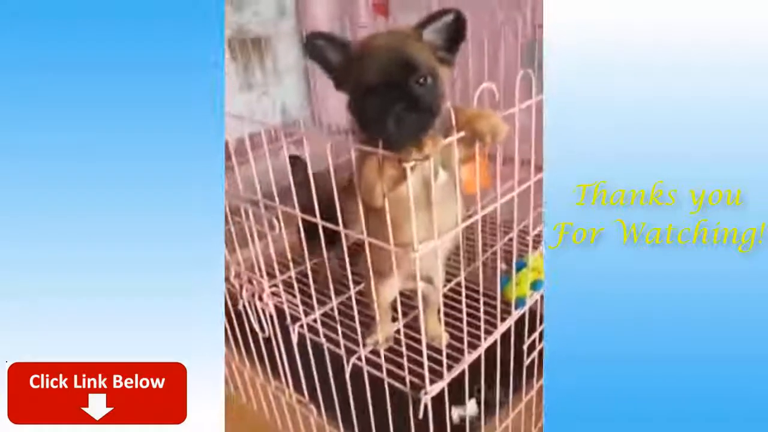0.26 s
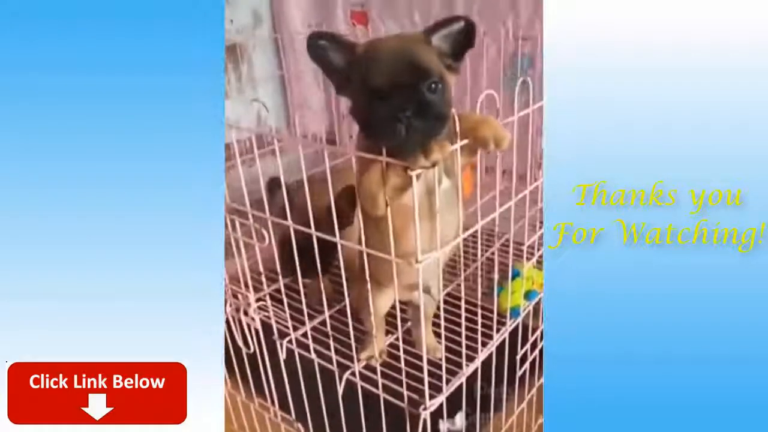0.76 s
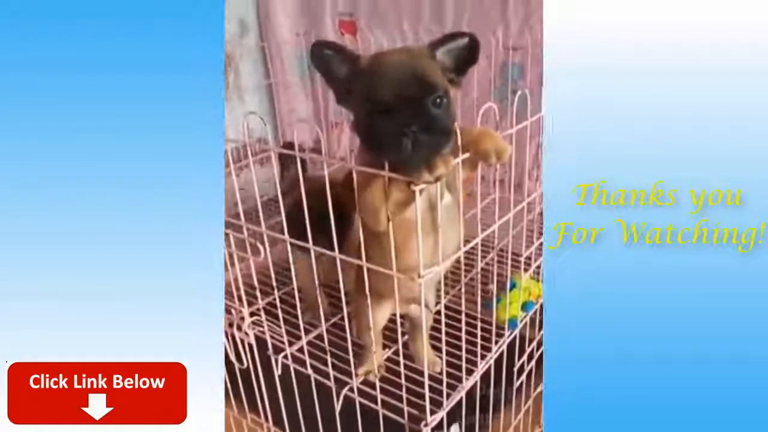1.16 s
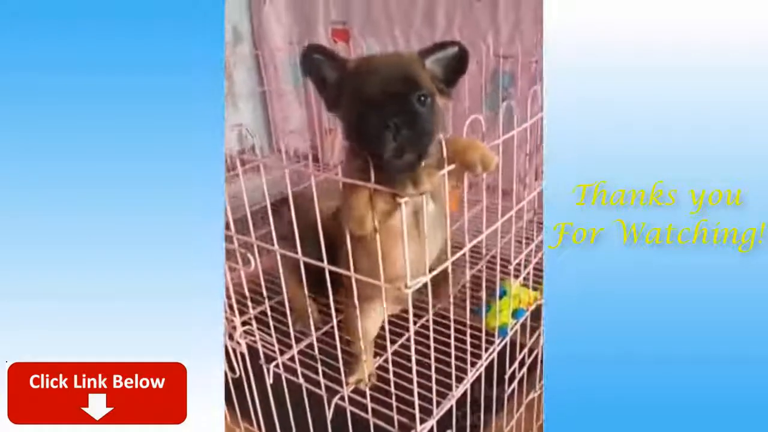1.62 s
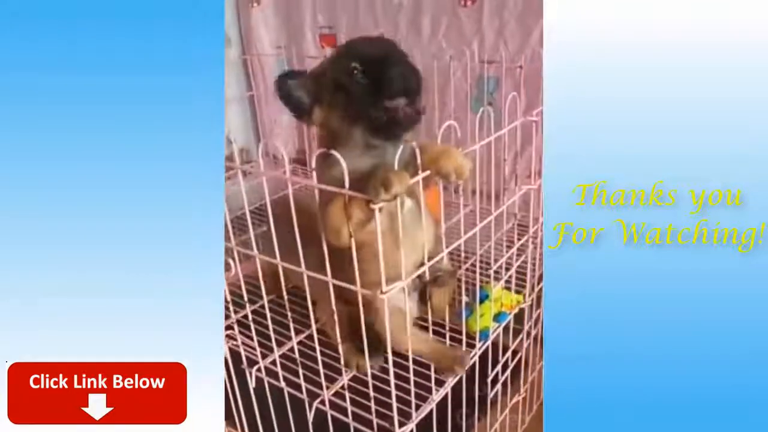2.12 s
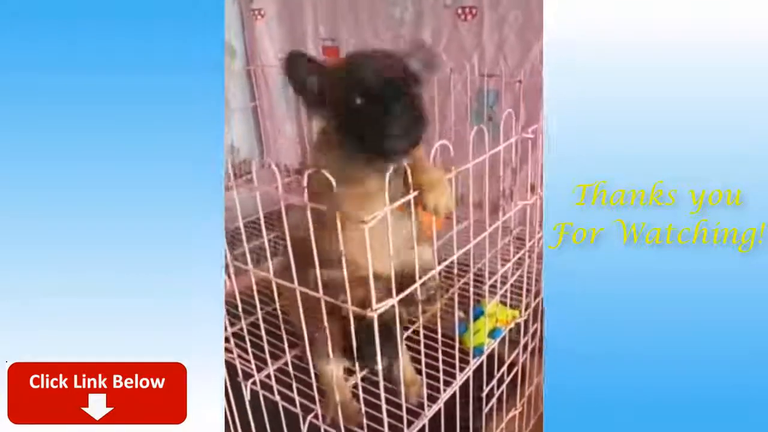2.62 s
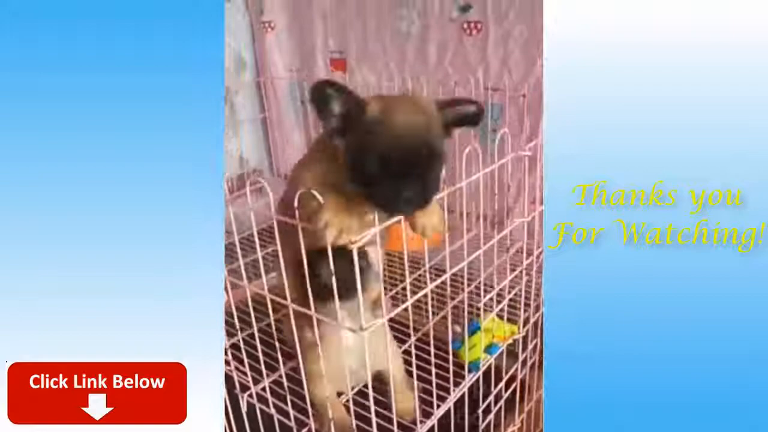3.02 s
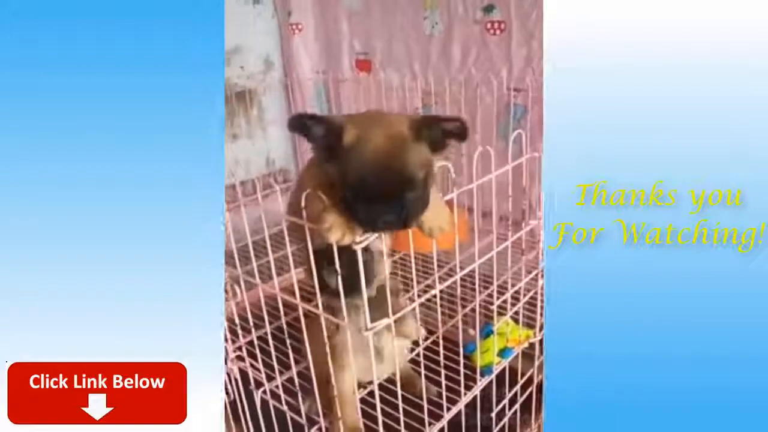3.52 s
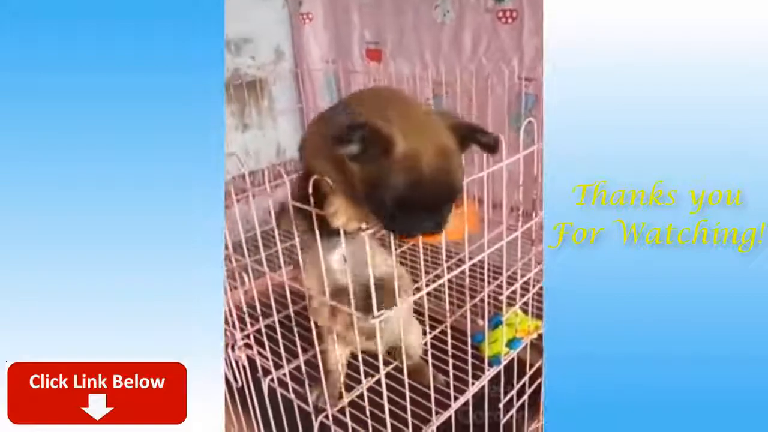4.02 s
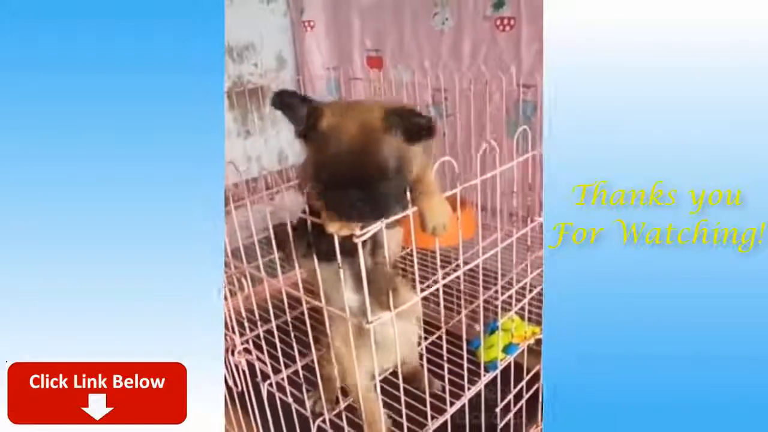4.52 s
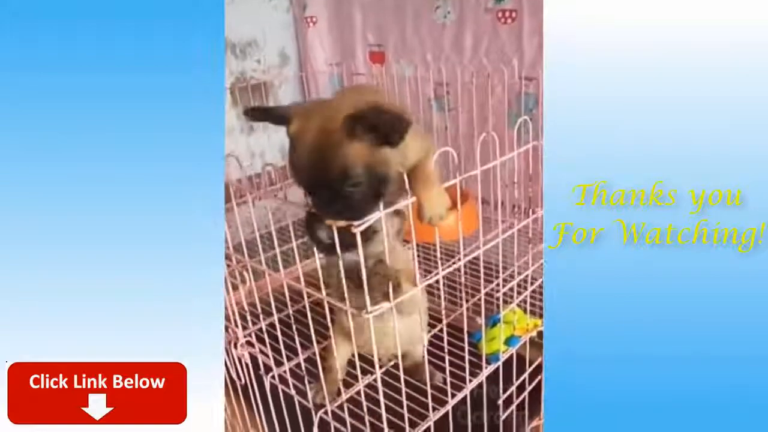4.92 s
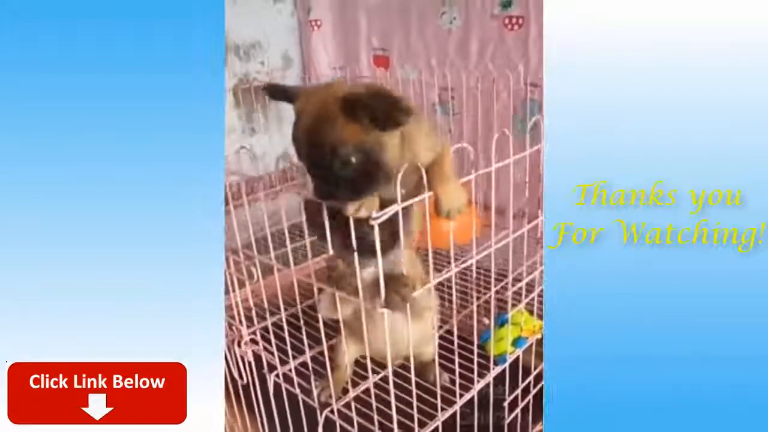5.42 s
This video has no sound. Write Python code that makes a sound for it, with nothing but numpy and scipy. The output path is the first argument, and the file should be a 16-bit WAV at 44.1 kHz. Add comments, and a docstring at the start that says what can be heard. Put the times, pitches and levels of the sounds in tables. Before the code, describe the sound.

A puppy in a wire cage grumbles, then growls creakily with a thin whine on top. It breaks into two loud, high cries that flick upward, followed by a short yelp. A soft whimper, a harsh shriek and a last grumble follow. Its paws occasionally tick and scrape on the wires. The microphone is close, and the small, hard-walled room rings after each call over a faint rumble and hiss.

```python
"""A puppy cries and grumbles against the bars of a wire cage in a small, hard-walled room.
Its slack vocal folds slap in creaky, uneven pulses, often with a thin whine on top; tense, they give
bright cries that grow louder as the mouth opens and end in an upward flick. The wires tick and scrape
under its paws, and the room rings after each call. Beneath lie a low rumble and a faint hiss,
which gain control pushes down during the loud cries."""
import sys
import numpy as np
from scipy import signal
from scipy.fft import rfft, irfft, next_fast_len
from scipy.io import wavfile
from scipy.ndimage import uniform_filter1d

SR = 44100
rng = np.random.default_rng(int(sys.argv[2]) if len(sys.argv) > 2 else 0)


def dump(signal):
    """Clip the signal to [-1, 1] and save it as 16-bit WAV at the path in sys.argv[1]."""
    limited = np.clip(np.atleast_2d(signal).T, -1, 1)
    pcm = np.round(limited * 32767).astype(np.int16)
    wavfile.write(sys.argv[1], SR, pcm)


N = 249606
BAND_LIMIT_HZ = 15500

# throat spectra, mouth open, stretched wide, screaming, yelping, nearly shut: f/Hz, gain/dB
OPEN = [(350, -36), (600, -6.5), (1250, -4), (1900, 0), (2500, -5.5), (3200, -10.5), (4400, 2.5),
        (5300, -9), (6200, -5), (8200, -12.5), (8900, -24.5), (15000, -40.5)]
GAPING = [(350, -25.5), (600, -9), (1800, -3.5), (2400, -6), (3000, -13.5), (4150, 7.5), (4750, -8),
          (5950, -5.5), (7100, -20), (8300, -12), (8900, -29), (10200, -22), (15000, -38)]
SCREAM = [(450, -19), (900, 7.5), (1400, -6), (2200, 9), (2750, -0.5), (3550, -16.5), (4400, -8.5),
          (5300, -30), (7000, -49), (8200, -20.5), (9400, -47), (10600, -28.5), (11800, -73)]
YELP = [(400, -12), (600, 0), (1150, 3.5), (1500, -2.5), (2250, -0.5), (2600, -1), (3020, 5), (3700, -7),
        (4700, -4.5), (5400, -13), (7300, -34), (8300, -21), (9000, -23.5), (10100, -21), (11400, -22),
        (13500, -44)]
PURSED = [(750, -0.5), (1900, 5), (2800, -8), (3700, -20), (8400, -29), (10000, -50)]
# held part of each cry: t/s, pitch/Hz, mouth resonance/Hz
LONG_CRY = [(1.732, 603.3, 1060), (1.78, 601.3, 980), (1.816, 633.2, 1550), (1.9, 613.7, 1207),
            (1.984, 635.4, 1160), (2.028, 665.6, 1650), (2.06, 680.3, 2040), (2.14, 655.3, 2360),
            (2.228, 601, 2380), (2.285, 641, 2130)]
SECOND_CRY = [(2.473, 464.4, 1540), (2.5, 540.4, 2160), (2.535, 589.2, 2140), (2.6, 599.8, 2360),
              (2.7, 586.4, 2250), (2.76, 589.4, 1890), (2.785, 594.7, 1780)]
SHORT_YELP = [(3.037, 424.4, 1460), (3.072, 443, 1790), (3.092, 549.7, 2200), (3.144, 607.2, 2170),
              (3.165, 566.5, 2100), (3.198, 590.5, 2220)]
WHIMPER = [(3.785, 704, 750), (3.814, 856, 860), (3.85, 925, 980), (3.888, 915.4, 834),
           (3.943, 970.4, 1000)]
SHRIEK = [(4.775, 798, 1860), (4.829, 935, 2300), (4.895, 848, 2260), (4.934, 876, 2780),
          (4.989, 902, 2590), (5.037, 908, 950), (5.065, 901, 980)]
# cries: curve, throat, body level at widest mouth/dB, treble re body/dB, mouth resonance gain/dB,
# swell/s, flick length/s, flick rise/octaves, flick gain/dB
CRIES = [(LONG_CRY, OPEN, -7, -0.61, 18.4, 0.014, .05, 0.97, -6.5),
         (SECOND_CRY, GAPING, -10, -3, 15.7, 0.013, .09, 0.76, -8),
         (SHORT_YELP, YELP, -14, -7.5, 12.5, 0.009, 0.012, 1, -7),
         (WHIMPER, PURSED, -23, -32.5, 10.9, 0.012, 0.041, 0.22, -5.5),
         (SHRIEK, SCREAM, -19, -8.5, 18.5, 0.011, 0.042, 0.268, 0.68)]
# fold strain per cry: onset roughness/0-1, held roughness/0-1, settling/s, doubling/0-1, air sizzle/dB
FOLD_STRAIN = [(.3, .052, .05, .1, 12), (.7, .07, .045, .15, 11), (.12, .28, .05, .03, 11),
               (.2, .1, .08, 0, 0), (.75, .11, .13, .5, 16)]

def cry(curve, throat, level_db, bright_db, mouth_db, swell_s, flick_s, flick_octaves, flick_db, strain,
        mouth_width_hz=300, shut_hz=1160, jitter=0.0602, rasp=0.24, shimmer_db=4, release_db=7):
    """Vibrating folds and the air they chop pass the throat and a moving mouth resonance."""
    t = np.arange(curve[0][0], curve[-1][0] + flick_s, 1 / SR)
    hz, mouth_hz = follow(curve, t)
    age_s = t - t[0]
    onset = np.exp(-age_s / swell_s)
    flick = np.clip((t - curve[-1][0]) / flick_s, 0, 1)
    # soft, dull onset; louder and brighter as the mouth opens; thinner treble in the flick
    opening_octaves = np.log2(mouth_hz / mouth_hz.max())
    body_db = level_db + 4.5 * opening_octaves - 6 * onset + flick_db * np.sqrt(flick)
    body_db += 2 * wander(len(t), hz=22.3)
    treble_db = body_db + bright_db + 9 * opening_octaves - 33 * onset - 4.5 * np.sqrt(flick)
    mouth_hz = mouth_hz + (shut_hz - mouth_hz) * flick

    rough_onset, rough_held, settle_s, doubled, sizzle_db = strain
    unsettled = np.exp(-(age_s / settle_s) ** 2)
    rough = rough_held + (rough_onset - rough_held) * unsettled + .4 * np.sqrt(flick)
    doubling = doubled * np.sqrt(unsettled)
    flutter = .18 * np.maximum(wander(len(t), hz=14), 0)
    tremor = .0025 * wander(len(t), hz=40)
    hz = hz * 2 ** (flick_octaves * flick) * (1 + jitter * rough * wander(len(t), hz=167) + tremor)
    cycles = np.cumsum(hz) / SR

    folds = np.zeros(len(t))
    for k in np.arange(1, 67) / 2:
        # alternating strong and weak cycles put lines halfway between the harmonics
        weight = doubling + flutter * min(k * hz[0] / 6000, 1) ** 2 if k % 1 else 1
        db = at_hz(throat, k * hz) + mouth_db / (1 + ((k * hz - mouth_hz) / mouth_width_hz) ** 2)
        db -= release_db * np.log2(max(k, 1)) * np.exp((t - t[-1]) / 0.0037)  # folds stop meeting
        db += shimmer_db * min(k / 4, 1) * wander(len(t), hz=18)  # head movement
        partial = np.cos(2 * np.pi * (k * cycles + rng.random()))
        folds += weight * gain_of(db) * (k * hz < BAND_LIMIT_HZ) * partial
    air = colour((1 + np.cos(2 * np.pi * cycles)) * rng.standard_normal(len(t)), throat)
    sizzle = colour(unit_rms(air), [(2500, 0), (7000, sizzle_db)])
    voice = unit_rms(folds) * (1 + .5 * rough * wander(len(t), hz=80)) + rasp * rough * sizzle
    return t[0], faded(set_bands(voice, body_db, treble_db, window_samples=400), .008, .012)


# treble flares in the cries: t/s, half length/s, f/Hz, lift/dB
MOUTH_FLARES = [(1.817, 0.052, 8370, 15), (1.841, 0.029, 4740, 8), (2.16, 0.04, 6400, 6),
                (2.311, 0.012, 4800, 7), (2.476, 0.013, 5800, 21), (2.568, 0.11, 6300, 12.5),
                (2.772, 0.061, 8700, 14), (3.049, 0.03, 11070, 19.5), (4.977, 0.13, 6500, 15)]

def mouth_flares(x, width_hz=1140):
    """As the mouth changes shape, groups of high overtones briefly stand out."""
    hz, t, spectrum = signal.stft(x, SR, nperseg=256)
    lift_db = 0
    for at_s, half_s, centre_hz, db in MOUTH_FLARES:
        band = np.exp(-((hz - centre_hz) / width_hz) ** 2)
        moment = np.exp(-((t - at_s) / half_s) ** 2)
        lift_db += db * np.outer(band, moment)
    return signal.istft(spectrum * gain_of(lift_db), SR, nperseg=256)[1][:N]


# throat spectra, deep growl and short grumble: f/Hz, gain/dB
DEEP = [(120, -30.5), (260, -16.5), (450, -22.5), (620, -11.5), (790, -1.5), (1050, -4), (1450, -18),
        (2100, -7.5), (2450, -15), (2850, -32.5), (4200, -41.5), (5900, -26.5), (7200, -41), (10500, -44.5),
        (12000, -59)]
SHORT = [(120, -43), (260, 0.5), (600, -3), (850, 12.5), (1100, 8), (1550, -1), (2250, 6), (2650, -5),
         (3100, -16.5), (4600, -25.5), (6000, -18), (7500, -35.5), (10500, -33), (12000, -55)]
# course of each growl: t/s, pulse rate/Hz, period scatter/0-1, body level/dB
FIRST_GRUMBLE = [(0, 190, 0.45, -31.5), (.13, 204, 0.34, -32), (.18, 110, .3, -36)]
LONG_GROWL = [(.95, 200.1, 0.39, -36), (1.02, 259.5, 0.33, -26), (1.35, 289.4, 0.19, -26),
              (1.58, 340.7, 0.082, -27), (1.675, 383.2, 0.029, -25), (1.735, 340, 0.045, -40)]
GRUNT = [(3.76, 197.6, 0.43, -32.5), (3.805, 279.4, .2, -28)]
CREAK = [(4.304, 138.6, 0.26, -33), (4.325, 302.6, 0.053, -35), (4.375, 276.6, 0.054, -31.5),
         (4.392, 170.2, 0.22, -36), (4.412, 330.5, 0.043, -29), (4.455, 371.7, 0.031, -36.5),
         (4.487, 360, 0.024, -38.5)]
LAST_GRUMBLE = [(5.318, 251.7, .35, -34), (5.365, 302.8, 0.12, -32), (5.42, 327.5, 0.072, -31.5),
                (5.505, 331.5, 0.044, -31), (5.575, 327.4, .06, -36.5)]
# growls: curve, first rasp re body/dB, last rasp re body/dB, throat
GROWLS = [(FIRST_GRUMBLE, -15.5, -18.5, SHORT), (LONG_GROWL, -25.5, -12, DEEP), (GRUNT, -35, -47, SHORT),
          (CREAK, -35.5, -25.5, SHORT), (LAST_GRUMBLE, -24.5, -24.5, SHORT)]
# muzzle cavities: f/Hz, width/Hz
MUZZLE_CAVITIES = [(320, 70), (800, 130), (1080, 160), (1900, 250), (2300, 200), (2650, 250)]

def growl(curve, first_rasp_db, last_rasp_db, throat, puff_cycles=.3, heave_db=1.3):
    """Slack folds slap shut, unevenly or on a low note; each slap rings the throat and frees a puff."""
    t = np.arange(curve[0][0], curve[-1][0], 1 / SR)
    rate_hz, scatter, body_db = follow(curve, t)
    cycles = np.cumsum(rate_hz * np.exp(scatter * wander(len(t), hz=150))) / SR
    slaps = np.diff(np.floor(cycles), prepend=-1) * np.exp(.22 * rng.standard_normal(len(t)))
    puffs = (.1 + np.exp(-(cycles % 1) / puff_cycles)) * rng.standard_normal(len(t))
    air = colour(unit_rms(puffs), [(2500, -15), (4500, 2)])
    voice = colour(unit_rms(slaps) + air, throat)
    for hz, width_hz in MUZZLE_CAVITIES:
        # all-pass: each cavity delays its band, so a slap rings on into the next
        radius = np.exp(-np.pi * width_hz / SR)
        poles = [1, -2 * radius * np.cos(2 * np.pi * hz / SR), radius ** 2]
        voice = signal.lfilter(poles[::-1], poles, voice)
    body_db += heave_db * wander(len(t), hz=14)
    treble_db = body_db + np.linspace(first_rasp_db, last_rasp_db, len(t))
    return t[0], faded(set_bands(voice, body_db, treble_db, window_samples=1000), 0.00082, 0.0091)


# whines and squeaks: t/s, length/s, first f/Hz, last f/Hz, end level/dB, swell/dB,
# overtone lift/dB, roughness/0-1
THIN_WHINES = [(0.178, 0.041, 1202, 1210, -33, 2.5, 4, 0.11), (1.021, 0.2, 821.8, 719, -25, -1.5, -4, .15),
               (1.239, 0.06, 954.4, 788, -22.5, 4, 7.5, 0.26),
               (1.505, 0.21, 779, 742.5, -29, -0.5, -3.5, 0.25), (1.6, 0.12, 997.4, 1237, -32, 0, -2, 0.16),
               (1.665, 0.075, 740.5, 612, -23, 13.5, 15.5, .1), (3.2, 0.1, 1157, 965, -22, -22, 13.5, .15),
               (4.455, 0.034, 1078, 1098, -27.5, 3.5, 9, 0.19),
               (5.489, 0.078, 979, 985.5, -28.5, 8, 1, 0.16), (5.563, 0.012, 1040, 1012, -23, 8, -4, 0)]

def whine(start_s, length_s, first_hz, last_hz, end_db, swell_db, bright_db, rough):
    """A thin, gliding tone rings above the calls; in the late grumbles (4.46 s, 5.49 s) it is the third
    harmonic of the growl's own low note ringing out. A growl beneath shakes it."""
    size = round(length_s * SR)
    progress = np.linspace(0, 1, size)
    hz = first_hz + (last_hz - first_hz) * progress ** 0.664  # fastest at the start
    hz *= 1 + 0.013 * wander(size, hz=18.7)
    hz *= 1 + .12 * rough * wander(size, hz=98)
    phase = 2 * np.pi * np.cumsum(hz) / SR
    tone = np.cos(phase)
    for k, db in ((2, -11), (3, -35)):
        tone += gain_of(db + bright_db) * np.cos(k * phase)
    shaken = unit_rms(tone * (1 + rough * wander(size, hz=250)))
    level_db = end_db + swell_db * (progress - 1)
    return start_s, faded(gain_of(level_db) * shaken, 0.054 * length_s, 0.061 * length_s)


# voice breaks: t/s, length/s, level/dB
VOICE_BREAKS = [(3.195, 0.037, -13.5), (4.774, 0.11, -22.5)]
# their spectrum: f/Hz, gain/dB
BREAK_SPECTRUM = [(300, -14), (1200, -1), (2000, 9), (2700, 8), (3600, 4.5), (4400, 2.5), (6800, -31),
                  (8200, -6), (12000, -56)]

def voice_break(start_s, length_s, level_db, flutter=0.19):
    """Folds off their note give a harsh, fluttering burst."""
    size = round(length_s * SR)
    burst = noise(size, BREAK_SPECTRUM) * (1 + flutter * wander(size, hz=297))
    return start_s, faded(gain_of(level_db) * burst, 0.015, 0.13 * length_s)


# whistle in the shriek: t/s, f/Hz, level/dB
SHRIEK_WHISTLE = [(4.78, 1890, -22), (4.808, 2090, -23), (4.822, 2270, -17), (4.87, 2200, -23.5),
                  (4.905, 2130, -14.5), (4.96, 2110, -25.5)]

def whistle(curve, cry_curve, lower_db=-14, upper_db=-4, jitter=0.0138):
    """A second, higher oscillator sounds inside a cry; the folds chop it into two sidebands."""
    t = np.arange(curve[0][0], curve[-1][0], 1 / SR)
    hz, level_db = follow(curve, t)
    folds_hz, _ = follow(cry_curve, t)
    phase = 2 * np.pi * np.cumsum(hz * (1 + jitter * wander(len(t), hz=220))) / SR
    fold_phase = 2 * np.pi * np.cumsum(folds_hz * (1 + jitter * wander(len(t), hz=220))) / SR
    lower = gain_of(lower_db) * np.cos(phase - fold_phase)
    upper = gain_of(upper_db) * np.cos(phase + fold_phase)
    return t[0], faded(gain_of(level_db) * unit_rms(np.cos(phase) + lower + upper), 0.0064, 0.014)


# wheeze in the long growl: t/s, length/s, first f/Hz, last f/Hz, width/Hz, level/dB
GROWL_WHEEZE = (1.015, .42, 6750, 5000, 260, -47)

def wheeze(start_s, length_s, first_hz, last_hz, width_hz, level_db):
    """Air squeezed through the tight throat hisses in one narrow, sinking resonance."""
    hz = np.linspace(first_hz, last_hz, round(length_s * SR))
    phase = 2 * np.pi * np.cumsum(hz) / SR
    hiss = wander(len(hz), width_hz) * np.cos(phase) + wander(len(hz), width_hz) * np.sin(phase)
    return start_s, faded(gain_of(level_db) * hiss, 0.14, 0.072)


# fold snaps: t/s, peak/dB
FOLD_SNAPS = [(.874, -40), (.92, -29), (0.937, -27.5), (3.743, -24.5), (3.765, -25), (4.264, -31),
              (4.297, -25.5), (4.762, -27), (4.773, -30), (5.316, -26.5)]

def fold_snaps():
    """Single slaps of the folds ring the throat just before a call."""
    out = np.zeros(N)
    snap = colour(signal.unit_impulse(2048), SHORT)
    for at_s, peak_db in FOLD_SNAPS:
        add(out, at_s, gain_of(peak_db) * snap / abs(snap).max())
    return out


def puppy():
    """All the calls of one throat."""
    out = np.zeros(N)
    for row, strain in zip(CRIES, FOLD_STRAIN):
        add(out, *cry(*row, strain))
    out = mouth_flares(out)
    for call, rows in ((growl, GROWLS), (whine, THIN_WHINES), (voice_break, VOICE_BREAKS)):
        for row in rows:
            add(out, *call(*row))
    add(out, *whistle(SHRIEK_WHISTLE, SHRIEK))
    add(out, *wheeze(*GROWL_WHEEZE))
    return out + fold_snaps()


# wire modes: f/Hz, level/dB, t60/s
WIRE_MODES = [(976, -1, 0.075), (2150, -19.5, 0.038), (2960, 11.5, 0.0033), (5600, -23, .01)]
# paw knocks: t/s, peak/dB
PAW_TICKS = [(0.013, -17), (3.668, -38), (4.115, -32), (4.598, -29)]
# claw slides: t/s, length/s, level before fades/dB
CLAW_SCRAPES = [(0.195, 0.26, -52), (5.571, 0.13, -47.5)]

def cage(slips_per_s=1500):
    """A claw knocks a wire, which rings briefly under the paw, or scrapes along it in tiny slips."""
    out = np.zeros(N)
    t = np.arange(SR // 10) / SR
    ring = sum(gain_of(db - 60 * t / t60) * np.sin(2 * np.pi * hz * t) for hz, db, t60 in WIRE_MODES)
    for at_s, peak_db in PAW_TICKS:
        add(out, at_s, gain_of(peak_db) * ring / abs(ring).max())
    for at_s, length_s, level_db in CLAW_SCRAPES:
        size = round(length_s * SR)
        slips = rng.standard_normal(size) * (rng.random(size) < slips_per_s / SR)
        scrape = unit_rms(colour(slips, [(2000, 11), (5000, 6), (14000, -9)]))
        add(out, at_s, gain_of(level_db) * faded(scrape, 0.0031, 0.14))
    return out


# room decay: f/Hz, t60/s
ROOM_DECAY = [(200, 0.66), (700, 0.71), (1800, 0.55), (4500, 0.52), (8000, 0.43), (14000, 0.37)]

def room(x, wet_db=-8, build_s=0.029, echoes_per_s=3000, early_db=-11, early_s=.012, early_count=6):
    """The cage tray and near walls reflect first; dense echoes build up, then die away by band."""
    echoes = rng.choice([-1., 1.], SR) * (rng.random(SR) < echoes_per_s / SR)
    hz, t, spectrum = signal.stft(echoes, SR, nperseg=256)
    decay = gain_of(-60 * t / at_hz(ROOM_DECAY, hz)[:, None])
    tail = signal.istft(spectrum * decay, SR, nperseg=256)[1][:SR]
    tail *= np.minimum(np.arange(SR) / (build_s * SR), 1)
    midband = abs(rfft(tail))[500:3000]  # 1 Hz bins
    out = gain_of(wet_db) * signal.fftconvolve(x, tail)[:N] / np.sqrt(np.mean(midband ** 2))
    for delay_s in early_s * (.2 + rng.random(early_count)):
        add(out, delay_s, gain_of(early_db) * x / np.sqrt(early_count))
    return out


# rumble and hiss spectra: f/Hz, gain/dB
RUMBLE_SPECTRUM = [(20, -34), (55, 1), (95, 9), (170, 8.5), (450, -3), (900, -33)]
HISS_SPECTRUM = [(120, -23), (250, -2), (900, -5.5), (3000, -11), (8000, -20.5), (11000, -45)]
# their shared swell: t/s, gain/dB
BACKGROUND_SWELL = [(0, 16), (.55, -7), (.85, -3), (1.05, 5.5), (3.6, 4.5)]

def background(rumble_db=-58, hiss_db=-61.5, drone_db=-49.9, drone_hz=160, drone_s=0.78):
    """A low rumble and a faint hiss swell and sink together; a low drone dies away at the start."""
    swell_db, = follow(BACKGROUND_SWELL, np.arange(N) / SR)
    out = gain_of(rumble_db + swell_db) * noise(N, RUMBLE_SPECTRUM)
    t = np.arange(round(drone_s * SR)) / SR
    drone = np.cos(2 * np.pi * drone_hz * t) * (1 + 0.25 * wander(len(t), hz=39))
    add(out, 0, faded(gain_of(drone_db) * unit_rms(drone), 0.0083, drone_s))
    return out + gain_of(hiss_db + swell_db) * noise(N, HISS_SPECTRUM)


def gain_of(db):
    return 10 ** (np.asarray(db) / 20)


def unit_rms(x):
    return x / np.sqrt(np.mean(x ** 2) + 1e-20)


def at_hz(points, hz):
    """Table value at hz, interpolated over log frequency."""
    f, value = np.transpose(points)
    return np.interp(np.log(hz + 1), np.log(f + 1), value)


def follow(curve, t):
    """Every column of a curve at the times t."""
    times, *columns = np.transpose(curve)
    return [np.interp(t, times, column) for column in columns]


def add(mix, start_s, sound):
    part = mix[round(start_s * SR):][:len(sound)]
    part += sound[:len(part)]


def faded(x, attack_s, release_s):
    t = np.arange(len(x)) / SR
    return x * np.minimum(t / attack_s, 1) * np.minimum(t[::-1] / release_s, 1)


def wander(size, hz):
    """Random motion of rms 1, rolled off above hz."""
    padded = next_fast_len(size)
    f = np.fft.rfftfreq(padded, 1 / SR)
    spectrum = rfft(rng.standard_normal(padded)) / (1 + (f / hz) ** 2)
    return unit_rms(irfft(spectrum, padded)[:size])


def colour(x, points, size=4096):
    """Minimum-phase filter through points (f/Hz, gain/dB): rings after a pulse, never before."""
    log_gain = np.log(gain_of(at_hz(points, abs(np.fft.fftfreq(size, 1 / SR)))))
    ring = np.fft.ifft(np.exp(np.conj(signal.hilbert(log_gain)))).real
    return signal.oaconvolve(x, ring[:size // 2])[:len(x)]


def noise(size, spectrum):
    return unit_rms(colour(rng.standard_normal(size), spectrum))


def set_bands(voice, body_db, treble_db, window_samples, split_hz=3300):
    """Sets the running rms of a voice below and above split_hz."""
    def steady(band):
        power = uniform_filter1d(uniform_filter1d(band ** 2, window_samples), window_samples)
        return band / np.sqrt(abs(power) + 1e-14)
    body = signal.sosfiltfilt(signal.butter(8, split_hz, fs=SR, output="sos"), voice)
    return gain_of(body_db) * steady(body) + gain_of(treble_db) * steady(voice - body)


def scene():
    """Puppy and cage in the room; one close microphone on both channels."""
    near = puppy() + cage()
    return np.tile(near + room(near) + background(), (2, 1))


def record(dry, limit_db=-20, ratio=110, attack_s=0.0017, recover_db_per_s=73.5):
    """Gain control clamps down quickly on loud calls and recovers slowly; then the band limit."""
    pole = np.exp(-1 / (attack_s * SR))
    power_db = 10 * np.log10(signal.lfilter([1 - pole], [1, -pole], (dry ** 2).mean(0)) + 1e-12)
    recovery_db = recover_db_per_s * np.arange(N) / SR
    held_db = np.maximum.accumulate(power_db + recovery_db) - recovery_db
    over_db = np.maximum(held_db - limit_db, 0)
    limited = dry / gain_of((1 - 1 / ratio) * uniform_filter1d(over_db, size=200))
    lowpass = signal.firwin(511, BAND_LIMIT_HZ, window=("kaiser", 9), fs=SR)
    return signal.oaconvolve(limited, lowpass[None], "same")


dry = scene()
out = record(dry)
dump(out)
```